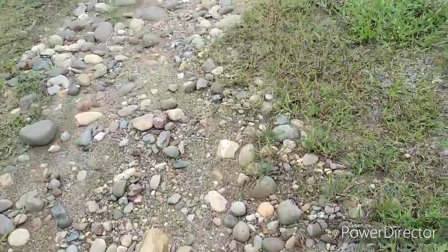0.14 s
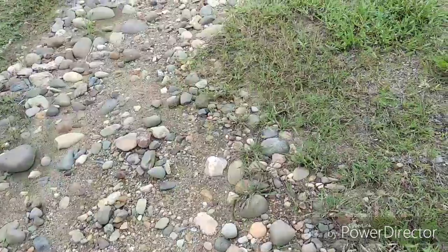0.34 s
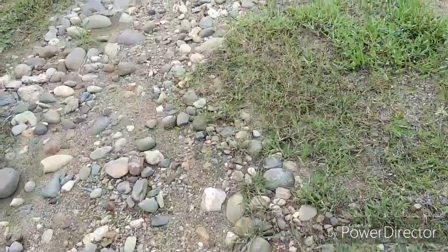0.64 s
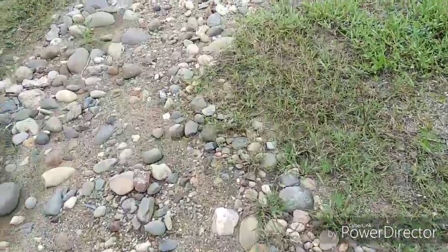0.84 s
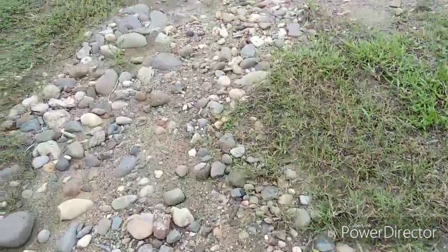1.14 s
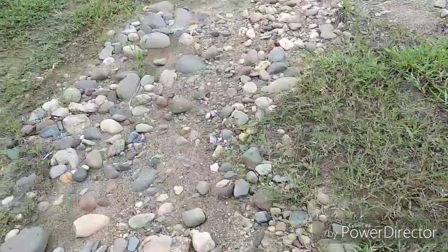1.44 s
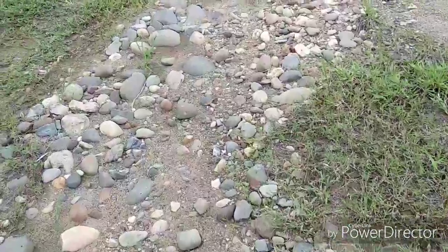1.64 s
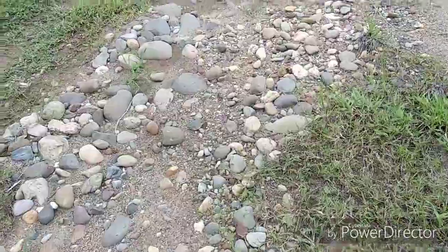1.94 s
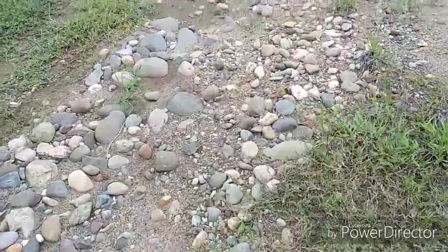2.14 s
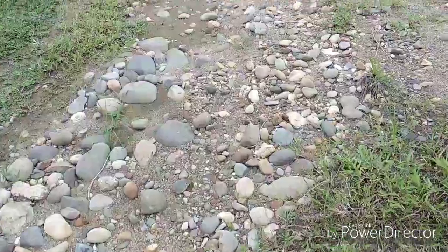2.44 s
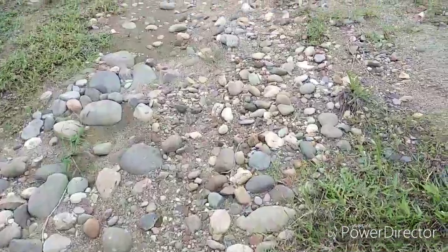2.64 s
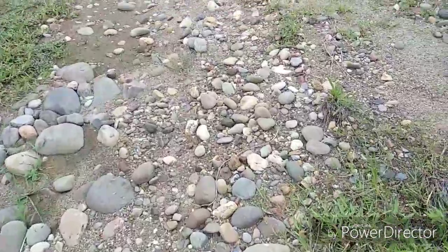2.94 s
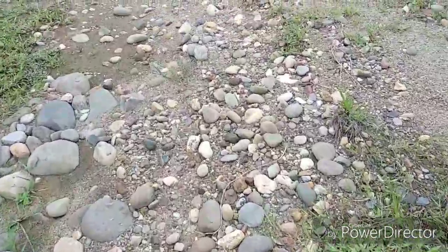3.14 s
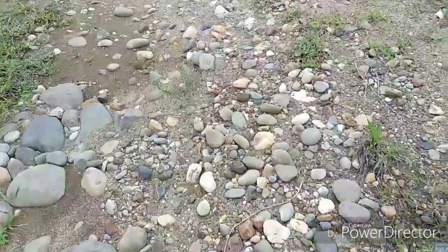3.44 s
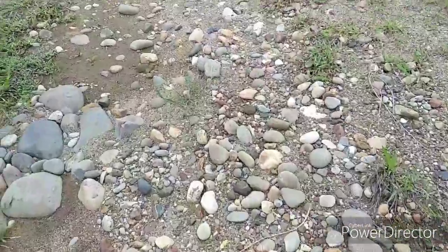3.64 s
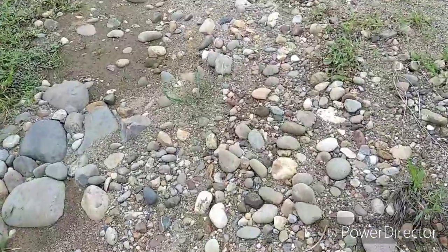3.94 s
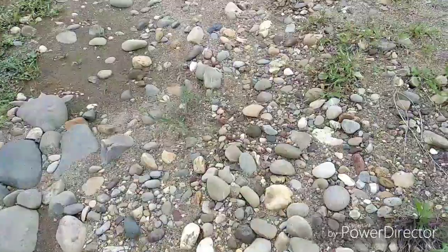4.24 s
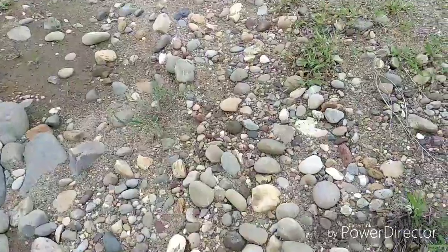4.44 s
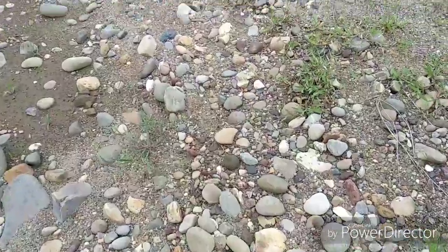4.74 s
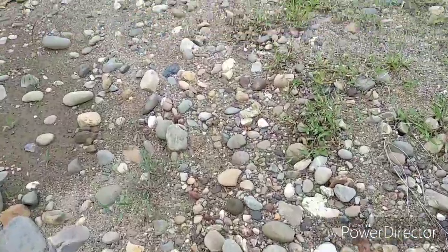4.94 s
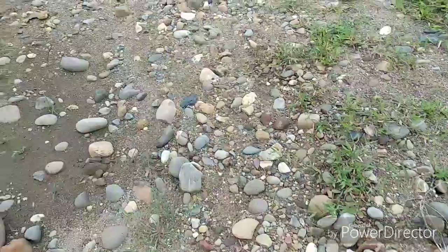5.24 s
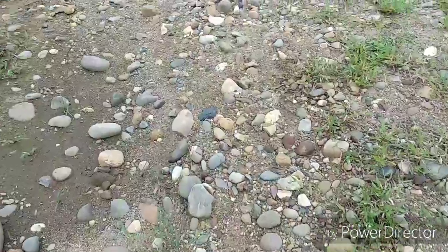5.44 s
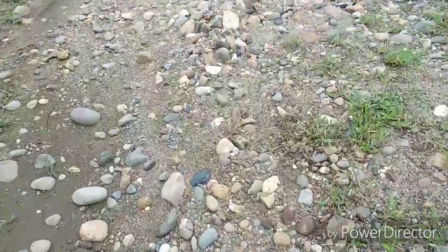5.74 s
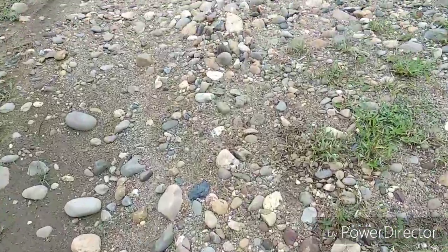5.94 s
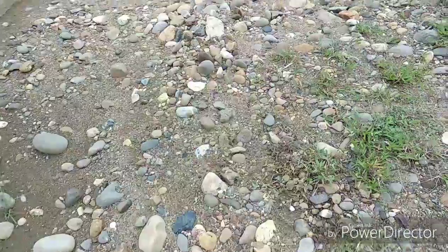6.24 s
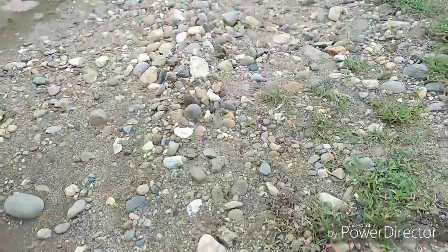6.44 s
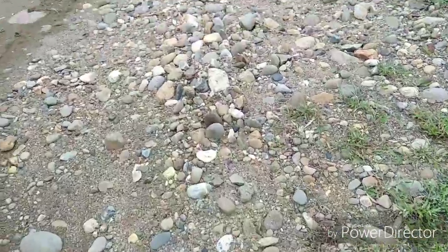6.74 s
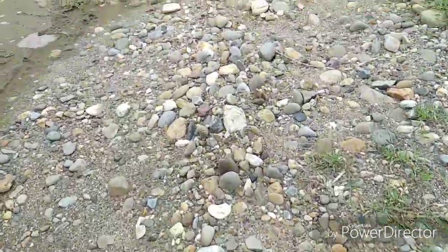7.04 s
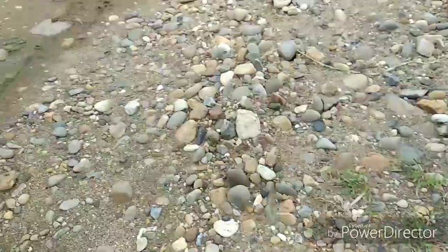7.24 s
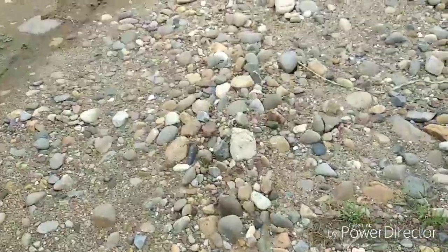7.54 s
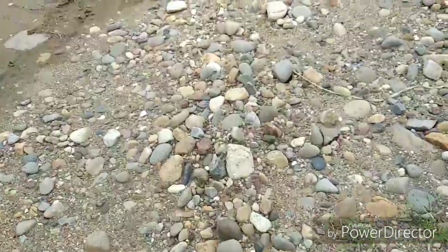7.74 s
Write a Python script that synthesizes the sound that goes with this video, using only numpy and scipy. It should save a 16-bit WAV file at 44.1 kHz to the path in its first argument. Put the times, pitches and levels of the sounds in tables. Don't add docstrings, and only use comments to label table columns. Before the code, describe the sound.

Outdoors on a stony riverbank, close to the ground, a slow walker treads on loose pebbles. From the start a high, thin cricket buzzes in quick paired chirps, mostly on the left, over a throbbing far chorus and low engine drone. At 0.6-0.9 seconds grit scrapes and pebbles click; small birds chirp near 0.9. Separate stone ticks follow at 1.2-1.7 and 2.2. The biggest step comes at 2.6-2.95: a dense crunch with hard, dry, ringing knocks. Light scrapes and chirps appear at 3.2-3.5. A soft heel lands at 4.3, grass swishes strongly around 4.85, and faint falling whistles and a short rising scuff follow near 5. The cricket rests from about 4.6 to 5.5 while a distant engine climbs in pitch, then steadies. Scrapes and clicks return at 6.3-6.9; crunching and knocks at 7.1-7.4 end with a dull, firm thud, leaving insects, hum and hiss.

```python
import sys
import numpy as np
from scipy import signal
from scipy.fft import rfft, irfft, next_fast_len
from scipy.io import wavfile
from scipy.ndimage import uniform_filter1d

SR = 44100
rng = np.random.default_rng(int(sys.argv[2]) if len(sys.argv) > 2 else 0)


def gain_from_decibels(decibels):
    exponent = np.asarray(decibels, float) / 20
    return 10 ** exponent


def store_pcm(level_fs):
    pcm = np.round(np.clip(level_fs, -1, 1) * 32767).astype(np.int16)
    wavfile.write(sys.argv[1], SR, np.atleast_2d(pcm).T)


N = 347067


def curve(table):
    s, *columns = np.transpose(table)
    return [np.interp(np.arange(N) / SR, s, c) for c in columns]


def band(x, lo_hz, hi_hz):
    y = signal.sosfilt(signal.butter(2, [lo_hz, min(hi_hz, .45 * SR)], "band", fs=SR, output="sos"), x)
    return y / np.sqrt(np.mean(y ** 2))


def walk(rate):
    k = int(SR / rate)
    held = np.repeat(rng.standard_normal(N // k + 1), k)
    return 1.155 * uniform_filter1d(uniform_filter1d(held, k), k)[:N]


def pan(x, db, lag=0):
    return np.array([np.roll(x[0], lag) * gain_from_decibels(db / 2), x[-1] * gain_from_decibels(-db / 2)])


def add(out, s, x):
    i = int(s * SR)
    a, b = max(i, 0), min(i + x.shape[1], N)
    out[:, a:b] += x[:, a - i:b - i]


def patchy(x, first, last, common_db, own_db, rate):
    size = next_fast_len(N)
    spectrum = rfft(x, size)
    place = 2 * np.log2(np.maximum(np.fft.rfftfreq(size, 1 / SR), 1))
    out = np.zeros((2, N))
    for centre in range(first, last):
        share = np.clip(1 - abs(place - centre), 0, 1)
        out += irfft(spectrum * share, size)[:, :N] * gain_from_decibels(common_db + own_db * walk(rate))
    return out


def grains(rate, spread_db, alike):
    size_db = spread_db * np.minimum(rng.exponential(size=(3, N)), 3.4)
    ticks = (rng.random((3, N)) < rate / SR) * gain_from_decibels(size_db) * rng.choice([-1, 1], (3, N))
    return np.sqrt(alike) * ticks[0] + np.sqrt(1 - alike) * ticks[1:]


def crunch():
    # (time [s], level [dB])
    stir = [(0.0, -59), (0.53, -60), (0.81, -56.5), (0.96, -57.5), (2.5, -58), (2.66, -51.5), (2.94, -58),
            (3.35, -52), (3.68, -58), (3.88, -59.5), (4.9, -53), (5.68, -58.5), (5.98, -62.5), (6.29, -59),
            (6.62, -57), (7.19, -51.5), (7.41, -58), (7.87, -56.5)]
    # (middle [s], length [s], level [dB])
    swishes = [
        (.81, 0.33, -59),
        (1.55, 1, -64),
        (3.35, 0.49, -60),
        (3.664, 0.19, -54),
        (4.122, 0.77, -55),
        (4.408, 0.43, -62.5),
        (4.848, 0.41, -45),
        (6.42, 0.46, -54),
        (7.798, 0.29, -64),
    ]
    # (time [s], length [s], level [dB], fineness: sand up, coarse gravel down [dB])
    scrapes = [(0.733, 0.035, -46, 7.5), (0.743, 0.056, -44, 0), (0.768, 0.029, -48, 6),
               (0.799, 0.087, -54, 7), (1.182, 0.2, -69.5, -17), (1.555, 0.23, -57, 4),
               (2.692, 0.059, -52, 5), (2.725, 0.024, -49.5, -9), (2.73, 0.032, -55, -7),
               (2.769, 0.053, -55, -4), (2.846, 0.011, -50, -2), (2.874, 0.027, -42.5, -6.5),
               (3.41, 0.083, -46.5, 5), (3.47, .07, -58, 6), (4.267, 0.04, -62, 0), (5.06, 0.08, -59, 7),
               (5.085, .03, -59, 9), (6.27, 0.19, -61.5, -3), (6.361, 0.052, -49, 1),
               (6.405, 0.2, -56.5, -2.5), (6.716, 0.073, -62, -10), (6.92, 0.056, -68, -16),
               (7.04, 0.036, -68, -21), (7.1, 0.023, -56, -2), (7.114, 0.027, -41, -4),
               (7.13, 0.051, -43.5, 0.5), (7.25, 0.031, -64.5, -16.5), (7.299, 0.12, -61.5, -4)]
    edge_db = -3.5
    load = np.zeros((3, N))
    load[1:] = gain_from_decibels(curve(stir)[0] + np.array([[-.4], [-1.5]]))
    for s, length, db in swishes:
        swell = signal.windows.tukey(int(length * SR), .7)
        add(load, s - length / 2, np.outer([0, 0, gain_from_decibels(db)], swell))
    for s, length, db, fine_db in scrapes:
        u = np.linspace(0, 1, int(length * SR))
        sizes = gain_from_decibels(db + np.array([edge_db - fine_db, 0, edge_db + fine_db]))
        press = np.clip(u / 0.14, 0, 1) * np.clip((1 - u) / 0.52, 0, 1)
        add(load, s, np.outer(sizes, press))
    coarse = pan(band(grains(2500, 3.2, 0.57), 800, 3830) * load[0], 1.7, lag=-1)
    fine = pan(band(grains(5000, 1.1, 0.53), 2320, 9800) * load[1], 8.6, lag=-5)
    sand = pan(band(grains(8000, 4.2, 0.1), 8530, 15000) * load[2], 6.6, lag=-5)
    return patchy(coarse + fine + sand, 17, 30, 1.3 * walk(40), own_db=3.0, rate=45)


def strike(t, db, hz, crack_db, pan_db, low_hz):
    ring = 0.00051 + 0.26 / hz
    noise, turn = rng.standard_normal((4, len(t))), rng.random(4)
    push = np.exp(-((t - 1.68 * ring) / ring) ** 2)
    overtone_level = 0.17 + 0.62 * np.exp(-(np.log(2.96 * hz / 3750) / 0.35) ** 2)
    overtone_hz = min(hz, 5500) * (2.69 + 0.3 * turn[1])
    overtone = overtone_level * np.sin(2 * np.pi * (overtone_hz * t + turn[2]))
    body = push * (np.sin(2 * np.pi * (hz * t + turn[0])) + overtone)

    late = t - 2 * ring
    after = np.exp(-np.where(late < 0, -late / .0008, late / .0017))
    scatter = 0.43 * after * band(noise[:2], 0.87 * hz, 1.3 * hz)

    crack_hz = low_hz * (1 + 0.32 * turn[3])
    snap = np.exp(-abs(t - 1.97 * ring) / 0.00033)
    bright = band(noise[2] + 0.31 * noise[[3, 0]], 0.58 * crack_hz, 1.016 * crack_hz)
    crack = (1.65 * snap + 0.29 * after) * bright + 0.5 * snap * band(noise[3], 1070, 9300)
    low_part = pan(gain_from_decibels(db) * (body + scatter), .5 * pan_db, lag=-2)
    return low_part + pan(gain_from_decibels(crack_db) * crack, 2.12 * pan_db, lag=-3)


def stones():
    # (time [s], body peak [dB], body pitch [Hz], crack [dB], left minus right [dB])
    knocks = [(0.802, -46, 2630, -41, 7), (1.276, -39.5, 1010, -46, 2), (1.399, -33, 1370, -34, -0.5),
              (1.466, -32, 1410, -30, 2.5), (1.582, -39, 620, -37.5, 6.5), (1.703, -34, 3660, -38, 1),
              (2.211, -38, 3780, -35.5, 9), (2.642, -28, 3600, -30, 5.5), (2.684, -33, 3960, -28.5, 10),
              (2.725, -26, 2030, -30, 6.5), (2.742, -13.5, 2010, -29, 7), (2.7574, -15.5, 2100, -28, 6.5),
              (2.7655, -15.5, 2200, -32, 8), (2.7688, -20, 2320, -35, 6), (2.8243, -32.5, 4080, -44, 9),
              (2.845, -25, 2280, -27, 4), (2.886, -22, 2800, -30.5, 10.5), (4.437, -38, 3920, -52, 13),
              (7.1183, -27.5, 1624, -41, 10.5), (7.126, -42, 2750, -31, -8.5),
              (7.211, -38.5, 1888, -56, 19), (7.334, -34, 631.5, -38, 13), (7.338, -35, 844, -60, 13),
              (7.3625, -46, 4200, -60, 6)]
    # (time [s], body peak [dB], body pitch [Hz], crack [dB])
    clicks = [(0.591, -50, 2460, -43), (0.734, -46, 2120, -42), (0.808, -37, 3830, -37),
              (0.838, -46, 4050, -35.5), (0.857, -53, 3980, -36), (1.024, -47, 845, -57),
              (1.197, -46, 1780, -42), (1.315, -47, 2740, -40.5), (1.561, -44, 4040, -35),
              (2.147, -43, 2900, -38), (2.805, -38, 1570, -50), (2.875, -27, 2250, -26.5),
              (2.877, -34, 1610, -32), (2.896, -41, 3560, -42), (2.95, -39, 3840, -34),
              (3.082, -46, 3650, -54), (3.187, -43, 2900, -46), (3.425, -34.5, 3870, -36.5),
              (3.589, -44.5, 1300, -50), (4.609, -41, 3500, -38.5), (4.93, -54, 2880, -48),
              (6.373, -35, 4640, -42), (6.447, -40, 4915, -41), (6.544, -47, 3100, -39),
              (6.923, -43, 1440, -43), (7.044, -42, 1302, -54), (7.05, -40, 1410, -59),
              (7.258, -50, 2580, -44), (7.565, -42, 4047, -37.5)]
    # (time [s], body peak [dB], body pitch [Hz], crack [dB])
    further_clicks = [(.76, -38, 2900, -42), (0.77, -42, 3600, -40), (1.4, -38, 3800, -58), (1.447, -53, 1700, -58),
                      (1.467, -37, 3860, -58), (1.616, -50, 1250, -52), (1.702, -40, 2690, -58),
                      (1.703, -42, 1400, -58), (2.8247, -36, 1500, -36), (3.368, -47, 2100, -58),
                      (3.425, -41, 1850, -53), (3.495, -49, 4500, -40), (4.273, -49, 1900, -50),
                      (4.436, -47, 1310, -56), (6.373, -42, 2010, -48), (7.064, -44, 1500, -58),
                      (7.12, -33, 1510, -50), (7.14, -32, 1700, -45), (7.162, -37, 1600, -55),
                      (7.212, -38, 2600, -55), (7.327, -36, 800, -55), (7.34, -41, 2500, -58)]
    # (time [s], body peak [dB], body pitch [Hz], crack [dB])
    snaps = [(0.827, -48, 3740, -39), (2.727, -42, 1780, -43), (2.7665, -35, 760, -50),
             (2.832, -43, 2680, -40), (3.134, -45, 4590, -45), (3.367, -46, 4460, -56),
             (4.117, -54, 4400, -42), (4.334, -53, 729, -43), (4.757, -44, 3723, -43),
             (4.874, -62, 4400, -38), (6.238, -53, 1250, -48), (6.272, -59, 791, -55),
             (6.941, -50, 1126, -56), (7.082, -44, 1488, -58), (7.15, -35, 1900, -45),
             (7.2107, -38, 940, -58), (7.211, -31.5, 3640, -55), (7.292, -44, 3760, -54)]
    # (time [s], body peak [dB], body pitch [Hz], crack [dB])
    splinters = [(0.734, -44, 9300, -44), (0.752, -35, 9300, -48), (.803, -58, 9500, -36),
                 (.808, -56, 9500, -38), (.838, -58, 9500, -38), (.858, -58, 10500, -43),
                 (.921, -62, 9000, -49), (.996, -62, 9000, -53), (1.4, -50, 9500, -44),
                 (2, -58, 9000, -44.5), (2.641, -36, 8200, -44), (2.684, -38, 9000, -38),
                 (2.725, -36, 6960, -46), (2.742, -35, 6700, -42), (2.7585, -33, 7600, -44),
                 (2.7675, -15.5, 6900, -51), (2.844, -39, 6000, -31), (2.877, -33, 6600, -40),
                 (2.8792, -34, 9500, -45), (2.888, -24, 7400, -47), (2.896, -34, 7500, -45),
                 (3.457, -40, 6300, -48), (4.61, -50, 8500, -54), (4.93, -44, 11500, -37),
                 (6.272, -56, 9500, -52), (6.546, -36, 9500, -50), (7.121, -29, 6600, -48),
                 (7.126, -24, 6896, -49), (7.334, -34, 8000, -33)]
    pebble_crack_hz, grit_crack_hz, splinter_crack_hz = 8470, 11500, 12100
    pebble_pan_db, grit_pan_db = 5, 9
    hits = [(*k, pebble_crack_hz) for k in knocks]
    hits += [(*c, pebble_pan_db, pebble_crack_hz) for c in clicks + further_clicks]
    hits += [(*g, grit_pan_db, splinter_crack_hz) for g in splinters]
    hits += [(*g, grit_pan_db, grit_crack_hz) for g in snaps]
    lead_s = .006
    out, t = np.zeros((2, N)), np.arange(1280) / SR - lead_s
    for s, *stone in hits:
        add(out, s - lead_s, strike(t, *stone))
    return out


def thuds():
    # (time [s], peak [dB], pitch [Hz], hardness [0-1])
    heels = [
        (.5, -40, 199, 0),
        (0.949, -39, 189, 0),
        (4.291, -33, 200, 0),
        (6.74, -30.5, 159.4, 0),
        (7.335, -32.5, 392, 0),
        (7.3638, -23, 270, 1),
    ]
    out, t = np.zeros((2, N)), np.arange(4096) / SR
    for s, db, hz, hard in heels:
        rumble = band(rng.standard_normal(len(t)), .5 * hz, 1.3 * hz) * t / 0.014 * np.exp(-t / 0.013)
        decay = np.exp(-t * hz / (1.4 - .8 * hard)) * (1 - np.exp(-t / .0001))
        blow = decay * np.sin(2 * np.pi * (hz * t + .19 * hard))
        add(out, s, pan([gain_from_decibels(db) * (blow + (0.32 - 0.18 * hard) * rumble)], 5.0))
    return out


def scuff():
    s, length, first_hz, last_hz, db = 5.015, .105, 500, 2900, -47.5
    out = np.zeros((2, N))
    u = np.linspace(0, 1, int(length * SR))
    rough = band(rng.standard_normal((2, len(u))), 30.4, 650)
    climb = np.sin(2 * np.pi * np.cumsum(first_hz + (last_hz - first_hz) * u) / SR)
    swell = np.sqrt(np.sin(np.pi * u).clip(0))
    add(out, s, pan(gain_from_decibels(db) * swell * rough * climb, 2.3))
    return out


def near_cricket():
    # (first call [s], last call [s])
    bouts = [
        (-.0165, 2.3),
        (2.478, 3.32),
        (3.558, 4.4),
        (5.519, 6.15),
        (6.389, 6.61),
        (7.222, 7.65),
    ]
    # (time [s], peak [dB])
    facing = [(0, -48), (.3, -46), (.8, -50), (1.4, -43), (1.85, -47.5), (2.06, -44), (2.3, -51),
              (2.9, -44), (3.5, -55), (3.85, -42.5), (4.25, -52.5), (5.75, -51.5), (6.14, -55), (7.4, -51),
              (7.7, -58)]
    wing_hz, low_wing_hz, low_wing_db = 8150, 7925, -20
    call_s, pair_s = .2073, .048
    out, t = np.zeros((2, N)), np.arange(1200) / SR
    shape = np.clip(t / 0.0014, 0, 1) * np.clip((.023 - t) / 0.002, 0, 1)
    for s in np.concatenate([np.arange(a, b, call_s) for a, b in bouts]):
        db = np.interp(s, *np.transpose(facing))
        for late in (0, pair_s):
            turn = rng.random(2)
            chirp = np.sin(2 * np.pi * (wing_hz * t + turn[0]))
            chirp += gain_from_decibels(low_wing_db) * np.sin(2 * np.pi * (low_wing_hz * t + turn[1]))
            add(out, s + late, pan([gain_from_decibels(db) * shape * chirp], 16.8, lag=-1))
    return out


def cricket_chorus():
    # (time [s], level [dB])
    swells = [(0.0, -49), (0.55, -50.5), (1.62, -48.5), (2.78, -50), (3.04, -52), (4.23, -51), (4.51, -54),
              (7.0, -52), (7.87, -51.5)]
    db, = curve(swells)
    smear = signal.butter(2, 215, fs=SR)
    crowd = signal.lfilter(*smear, rng.standard_normal((2, N)) + 1j * rng.standard_normal((2, N)))
    crowd[1] = 0.81 * crowd[1] - 0.61 * crowd[0]
    throb = 1 + 0.25 * np.sin(2 * np.pi * np.cumsum(57.0 + 0.58 * walk(1.91)) / SR)
    crowd = (crowd * np.exp(2j * np.pi * 7633 * np.arange(N) / SR)).real * throb
    return pan(crowd / crowd.std() * gain_from_decibels(db), 11.8)


def birds():
    # (time [s], length [s], top pitch [Hz], level [dB])
    chirps = [
        (0.852, 0.036, 6900, -50),
        (1.012, 0.045, 6400, -53),
        (3.202, 0.029, 6000, -57),
        (3.222, 0.03, 6900, -50.5),
        (3.367, .022, 5920, -54),
        (3.386, .036, 6900, -51),
        (6.555, 0.038, 6960, -54),
        (6.72, 0.024, 6500, -51),
    ]
    # (time [s], length [s], first pitch [Hz], last pitch [Hz], level [dB])
    whistles = [
        (4.82, .11, 3450, 3180, -56.5),
        (4.925, .05, 3150, 2600, -57),
        (5.235, .03, 3180, 3050, -59),
        (5.262, .026, 3000, 2530, -58),
        (5.285, .016, 2600, 2950, -61),
        (5.213, .035, 5750, 5000, -60),
        (5.243, .03, 5600, 4900, -62),
    ]
    notes = [(s, length, 4900, hz, db, .47) for s, length, hz, db in chirps]
    notes += [(*w, 1.4) for w in whistles]
    out, pieces = np.zeros((2, N)), 8
    for s, length, first_hz, last_hz, db, bend in notes:
        u = np.linspace(0, 1, int(length * SR))
        n = len(u)
        warble = .03 if first_hz < last_hz else .003
        hz = first_hz + (last_hz - first_hz) * u ** bend
        hz = hz * (1 + warble * rng.standard_normal(n // 32 + 1).repeat(32)[:n])
        broken_db = 3 * rng.standard_normal(pieces).repeat(n // pieces + 1)[:n]
        whistle = np.sin(np.pi * u) ** 0.089 * np.sin(2 * np.pi * np.cumsum(hz) / SR)
        add(out, s, pan([gain_from_decibels(db + broken_db) * whistle], 18.0, lag=-2))
    leaves_s = (0.0063, 0.012, 0.038)
    echoes = sum(np.roll(out, int(late * SR), axis=1) for late in leaves_s)
    return 0.75 * out + 0.22 * echoes


def exhaust(table):
    hz, db = curve(table)
    t = np.arange(N) / SR
    fade_in = np.clip((t - table[0][0] + 0.16) / 0.2, 0, 1)
    fade_out = np.clip((table[-1][0] + 0.27 - t) / 0.11, 0, 1)
    note = np.sqrt(2) * np.sin(2 * np.pi * np.cumsum(hz * (1 + 0.01674 * walk(9))) / SR)
    return pan([note * fade_in * fade_out * gain_from_decibels(db + 3.1 * walk(8.7))], 0.95)


def engines():
    # (time [s], exhaust note [Hz], level [dB])
    truck = [(0, 107.2, -49), (.6, 107.5, -53.5), (1.3, 108.5, -46), (2.0, 108.8, -50.5),
             (2.25, 105.5, -56.5), (2.55, 101.2, -47), (2.8, 99.9, -53.5)]
    # (time [s], exhaust note [Hz], level [dB])
    climber = [(3.5, 70.2, -63), (3.66, 63.5, -71), (3.95, 64.2, -59.5), (4.41, 71.8, -51), (4.67, 82, -45),
               (4.98, 97.3, -49.5), (5.33, 103.3, -48.5), (6.69, 99.4, -46), (7.87, 99, -46.5)]
    # (time [s], exhaust note [Hz], level [dB])
    cruiser = [(0, 140.5, -59.5), (.6, 139.8, -51.5), (1.0, 143, -64), (1.5, 141, -60), (3, 139.9, -61.5),
               (3.9, 129.3, -62.5), (4.4, 134.6, -55), (4.9, 127.1, -69), (7, 133.8, -60.5),
               (7.4, 135, -53), (7.87, 133, -53)]
    return exhaust(truck) + exhaust(climber) + exhaust(cruiser)


def growl():
    # (time [s], level [dB])
    strain = [(0, -65.5), (3.9, -66), (4.3, -56.5), (4.5, -60), (5.1, -62), (6.2, -63.5), (6.8, -55),
              (7.1, -63), (7.4, -61), (7.87, -56.5)]
    noise = rng.standard_normal((2, N))
    rough = band(noise[0] + 0.22 * noise, 156, 407)
    return pan(rough * gain_from_decibels(curve(strain)[0] + 3.0 * walk(12)), 1.1)


def air():
    # (frequency [Hz], density [dB per Hz])
    colour = [(25, -5.5), (45, -28.5), (75, -1.5), (120, -4.5), (330, -14), (480, -24.5), (1000, -27.5),
              (2400, -31), (4000, -30), (6400, -38.5), (9000, -47), (11500, -32.5), (14000, -44.5),
              (16000, -33)]
    # (frequency [Hz], left-right likeness [0-1])
    likeness = [(60, 0.91), (250, 0.99), (640, 0.23), (1400, 0.07), (15000, 0.45)]
    # (frequency [Hz], left minus right [dB])
    tilt = [(60, 0), (400, -1), (1300, 0.5), (4400, 6), (8000, 26), (15000, -15)]
    size = next_fast_len(N)
    hz = np.maximum(np.fft.rfftfreq(size, 1 / SR), 1)

    def along(table):
        table_hz, value = np.transpose(table)
        return np.interp(np.log(hz), np.log(table_hz), value)

    alike = along(likeness)
    mid, side = rfft(rng.standard_normal((2, size)))
    mid, side = mid * np.sqrt(1 + alike), side * np.sqrt(1 - alike)
    ports = pan([mid + side, mid - side], along(tilt)) * gain_from_decibels(along(colour))
    noise = irfft(ports, size)[:, :N]
    out = patchy(noise, 9, 30, 0.098 * walk(0.34), own_db=2.5, rate=14)
    return out / out.std() * gain_from_decibels(-47)


def scene():
    feet = crunch() + stones() + thuds() + scuff()
    animals = near_cricket() + cricket_chorus() + birds()
    return feet + animals + engines() + growl() + air()


def roll_off(x):
    return signal.sosfilt(signal.butter(12, 15700, fs=SR, output="sos"), x)


def record(dry):
    heard = signal.sosfilt(signal.butter(3, 55, "high", fs=SR, output="sos"), dry)
    return roll_off(heard)


dry = scene()
out = record(dry)
store_pcm(out)
```